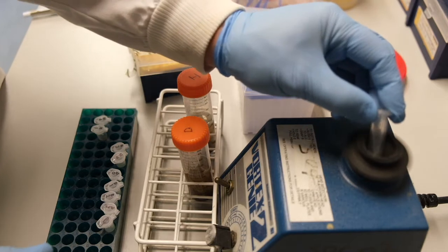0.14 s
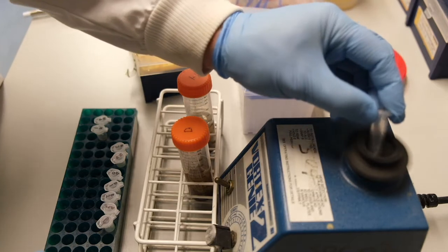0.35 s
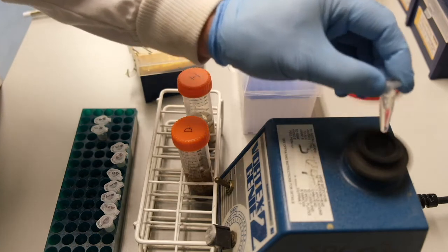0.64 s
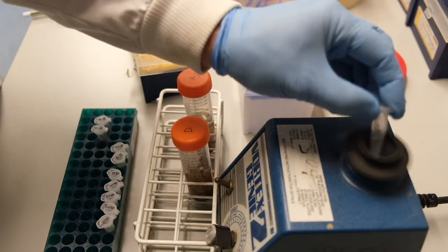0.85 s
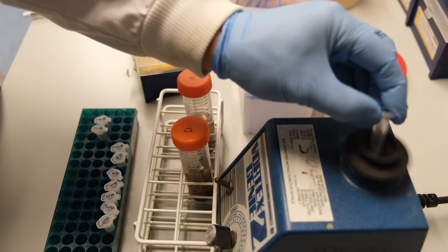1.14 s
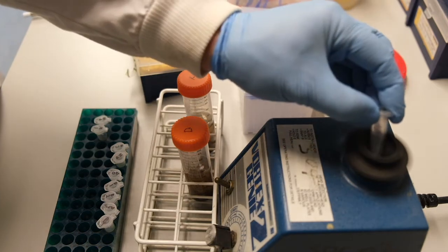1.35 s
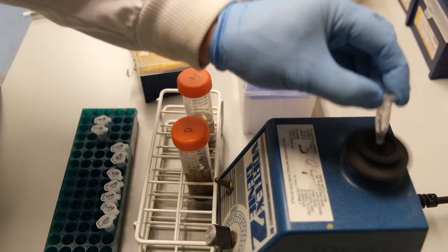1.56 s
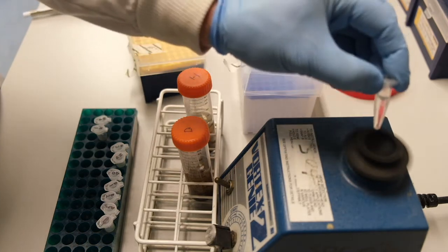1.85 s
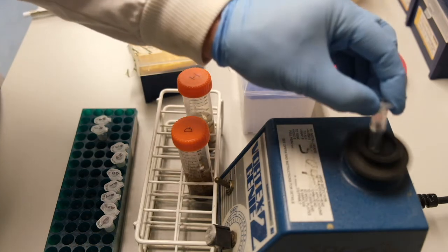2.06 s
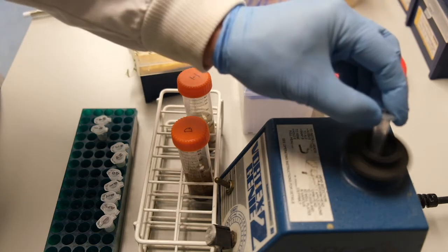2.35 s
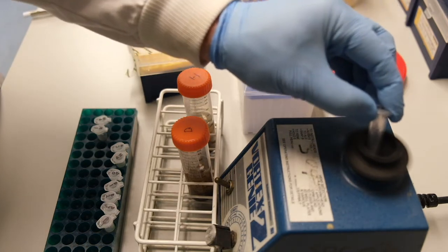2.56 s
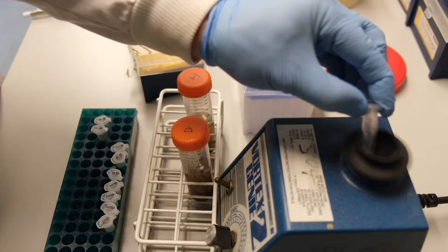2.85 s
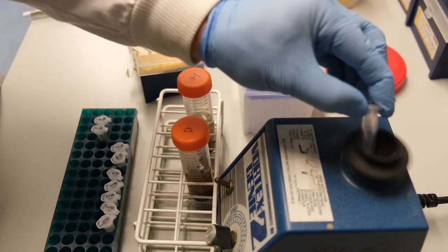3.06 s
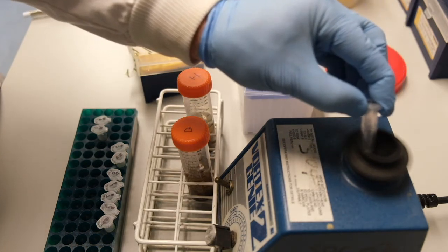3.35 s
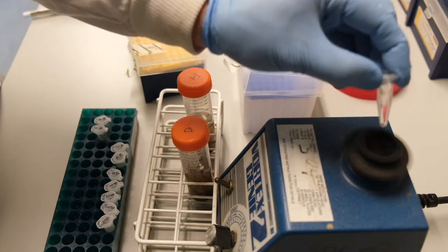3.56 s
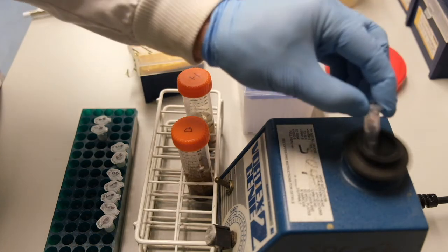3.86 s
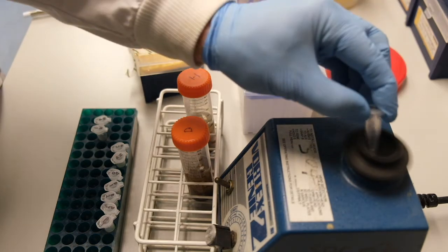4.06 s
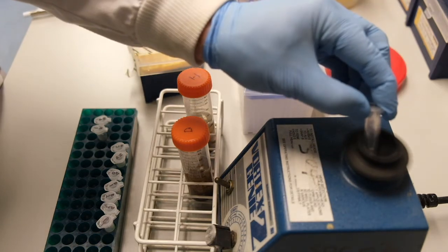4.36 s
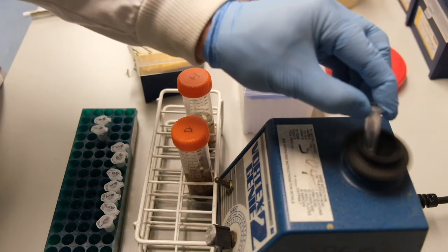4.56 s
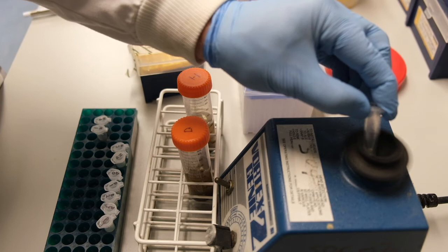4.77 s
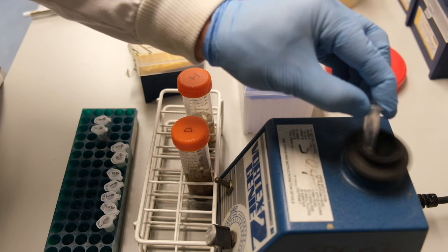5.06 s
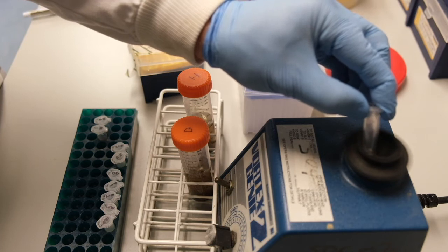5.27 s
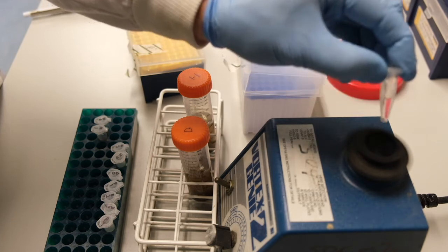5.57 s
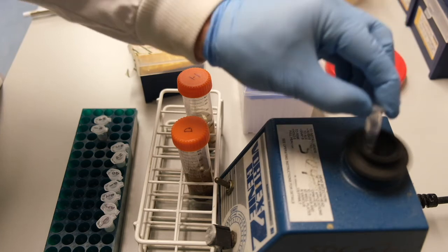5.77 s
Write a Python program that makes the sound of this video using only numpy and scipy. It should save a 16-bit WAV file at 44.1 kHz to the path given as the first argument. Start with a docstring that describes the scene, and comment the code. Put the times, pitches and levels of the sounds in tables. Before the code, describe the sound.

A plastic tube clicks and buzzes on and off as it is dipped into the cup of a humming lab mixer.

```python
"""Small vortex mixer on a lab bench: its eccentric weight thumps the housing once a turn.
A plastic microtube is dipped repeatedly into the orbiting rubber cup. It ticks going in and out;
while pressed it rattles against the cup twice a turn and stirs the rubber's resonances,
with a few faint squeaks. The bearing hisses faintly; another appliance drones in the room."""
import sys
import numpy as np
from scipy import signal
from scipy.fft import rfft, irfft, next_fast_len
from scipy.io import wavfile
from scipy.ndimage import uniform_filter1d

SR = 44100
rng = np.random.default_rng(int(sys.argv[2]) if len(sys.argv) > 2 else 0)


def materialize(psi):
    """Save the field psi as 16-bit PCM at rate SR to the path in sys.argv[1].

    A 1-D psi becomes a single channel; in a 2-D psi each row is a channel.
    """
    bounded = np.clip(np.atleast_2d(psi).T, -1, 1)
    quanta = np.round(bounded * 32767).astype(np.int16)
    wavfile.write(sys.argv[1], SR, quanta)


N = 261072
TIME_S = np.arange(N) / SR

# motor speed: time_s, turn_rate_hz
MOTOR_SPEED = [(0.0, 45.64), (0.3, 45.41), (0.5, 46.16), (0.8, 45.66), (1.15, 45.39), (1.55, 45.9),
               (1.95, 45.75), (2.2, 45.49), (2.55, 45.87), (2.9, 45.49), (3.4, 45.91), (3.75, 45.75),
               (4.05, 45.63), (4.5, 45.65), (4.9, 45.82), (5.2, 45.63), (5.45, 45.85), (5.92, 45.45)]
# hum envelope: time_s, level_db
HUM_LEVEL = [(0.0, -38.5), (0.08, -39.5), (0.33, -29.5), (0.48, -31.5), (0.54, -27.5), (0.74, -24),
             (1.25, -24.5), (1.32, -21.5), (1.5, -25.5), (1.52, -22), (1.88, -20.5), (2.01, -23),
             (3.76, -20.5), (3.87, -22), (4.29, -20.5), (4.32, -22), (5.74, -20), (5.92, -22.5)]
# housing and bench harmonics: multiple_of_turn_rate, relative_db
HUM_ORDERS = [(1, -16.5), (2, -4), (3, -5), (4, 1.5), (5, -3), (6, -2.5), (7, -12), (8, -13), (9, -22.5),
              (10, -7.5), (11, -7), (12, -24), (13, -20), (14, -24.5), (15, -23), (16, -31), (17, -29.5),
              (18, -30), (19, -34.5), (20, -32), (21, -29), (22, -57), (23, -32), (24, -35)]
# bearing hiss spectrum: freq_hz, gain_db
HISS_SPECTRUM = [(25, 0), (60, 17), (150, 20.5), (450, 15), (650, 12), (1000, 7), (1400, 3), (1800, -2),
                 (2400, -0.5), (3400, -6), (6400, -3), (8200, -16), (12000, -18.5), (16000, -20.5)]
# bearing resonances: pitch_hz, width_hz, relative_db
BEARING_RINGS = [(1055, 13, -28), (2494, 60, -13), (2982, 30, -15.5), (6230, 200, -21), (6950, 45, -22.5)]
# other appliance: pitch_hz, rms_db
DRONE_TONES = [(24.7, -51.5), (49.4, -63)]
# tube held in the cup, two wall contacts a turn: start_s, end_s, first_contact_db, second_contact_db,
# end_slack_db, looseness_ratio, midway_turns, start_gap_turns, end_gap_turns, treble_db, upper_ring_db
TUBE_PRESSES = [(0, .119, -68, -55.5, 0.5, 0.4, .32, 0.45, 0.47, -1, -73),
                (0.178, 0.383, -72, -46.5, 3.5, 0.53, 0.39, 0.51, 0.55, -6, -53),
                (0.899, 1.083, -38, -37, 1.5, 0.5, .38, 0.55, .56, 2.5, -41),
                (1.086, 1.199, -61, -48, 1.5, .25, 0.34, .52, 0.47, 7, -58),
                (1.201, 1.554, -43, -42, 2, 0.63, .71, .26, .22, 1, -43),
                (2.109, 2.187, -43.5, -41, 3, 0.5, 0.37, 0.4, 0.53, 0, -40.5),
                (2.191, 2.254, -45.5, -56, 1.5, .4, 0.4, 0.44, 0.5, 3.5, -58),
                (2.28, 2.429, -64.5, -45.5, 4.5, .25, .44, .5, 0.49, 4, -67),
                (2.77, 3.269, -43.5, -44, 5, 0.22, .475, .5, .6, -0.5, -49),
                (3.277, 3.407, -44.5, -46, 2, 0, .47, .66, .5, -1, -57),
                (3.869, 4.099, -40, -43.5, 4.5, .32, 0.45, 0.3, 0.71, -1.5, -45),
                (4.215, 4.524, -42, -44.5, 8, 0.3, .445, 0.75, 0.73, -2, -41.5),
                (4.919, 5.244, -53, -56.5, 4.5, .7, 0.6, 0.77, 0.77, -7, -48),
                (5.851, 5.97, -40.5, -45, 6.5, 0.26, 0.38, 0.56, 0.56, -3, -37.5)]
# modes of tube, cup and housing: pitch_hz, relative_db, t60_s
CONTACT_MODES = [(436, -9.5, 0.087), (950, -20, 0.036), (1440, -10.5, 0.0093), (2162, -7.5, 0.01),
                 (2440, -5, 0.0075), (2970, -17.5, 0.013), (3620, -10.5, 0.0065), (4690, -18.5, 0.025),
                 (5270, -26, 0.022), (5390, -13, 0.0094), (7510, -12, 0.007), (9900, -26, 0.011),
                 (10400, -20, 0.012)]
# dry plastic crack spectrum: freq_hz, gain_db
CRACK_SPECTRUM = [(300, -9.5), (900, -7), (1300, -4), (1700, -5.5), (2200, 6.5), (2600, 2.5), (3200, 2),
                  (4800, 3), (6500, -2), (8000, -3.5), (10000, -3.5), (12000, -10), (16000, -14.5)]
# tube strikes the cup going in or out: start_s, level_db, treble_db
RIM_TAPS = [(0.4721, -32.5, -1), (0.495, -36, 8.5), (0.7793, -24, 0), (0.7963, -21.5, 2),
            (0.8992, -21.5, -7), (1.936, -20.5, -10), (2.134, -19, -6), (2.2141, -23, -7),
            (2.259, -27, 5.5), (3.428, -25.5, -1.5), (3.454, -28.5, 3.5), (3.8025, -23, 0.5),
            (3.8199, -16, -2), (5.4177, -26, -6), (5.442, -26, 6.5), (5.7935, -21, 5), (5.8105, -24.5, -1)]
# rubber squeaks on the tube: start_s, end_s, level_db
RUBBER_SQUEAKS = [(4.485, 4.543, -48), (4.662, 4.787, -58), (4.923, 5.26, -59.5)]
# left-right likeness: freq_hz, correlation
STEREO_LIKENESS = [(100, 0.62), (500, 0.31), (1000, 0.7), (2000, 0.81), (4000, 0.33), (8000, 0.11),
                   (16000, 0.15)]
# stereo balance: freq_hz, left_minus_right_db
STEREO_BALANCE = [(180, -.3), (350, .7), (550, 1), (1200, -1.5), (2800, -1.3), (5500, 0), (10000, -2.4),
                  (14000, -4.6)]


def from_db(db):
    """Decibels to gain."""
    return 10 ** (np.asarray(db) / 20)


def unit_rms(x):
    """Scale to unit power."""
    return x / np.sqrt(np.mean(x ** 2) + 1e-20)


def at_hz(points, hz):
    """Interpolate a spectrum on a log-frequency axis."""
    freq_hz, value = np.transpose(points)
    return np.interp(np.log(np.maximum(hz, 1)), np.log(freq_hz), value)


def drift(rate_hz):
    """Slow random wander, unit rms."""
    hop, settle = 40, 2000
    pole = np.exp(-2 * np.pi * hop * rate_hz / SR)
    noise = rng.standard_normal(N // hop + settle + 2)
    slow = signal.lfilter([1], [1, -2 * pole, pole * pole], noise)[settle:]
    return np.interp(np.arange(N) / hop, np.arange(len(slow)), unit_rms(slow))


def ring(drive, hz, t60_s):
    """Damped mode: a unit click starts a unit sine."""
    radius, step_rad = 10 ** (-3 / (t60_s * SR)), 2 * np.pi * hz / SR
    poles = [1, -2 * radius * np.cos(step_rad), radius * radius]
    return signal.lfilter([0, np.sin(step_rad)], poles, drive + 1e-18)


def colour(x, spectrum, size=4096):
    """Minimum-phase filter with the given spectrum."""
    gain = from_db(at_hz(spectrum, np.fft.rfftfreq(size, 1 / SR)))
    cepstrum = irfft(np.log(gain))
    half = size // 2
    folded = np.r_[cepstrum[0], 2 * cepstrum[1:half], cepstrum[half], np.zeros(half - 1)]
    response = irfft(np.exp(rfft(folded)))
    return signal.fftconvolve(np.atleast_2d(x), response[None], axes=1)[:, :N]


def spread(pair):
    """Mid and side to left and right, least alike in the treble."""
    mid, side = rfft(pair, next_fast_len(N))
    alike = at_hz(STEREO_LIKENESS, np.linspace(0, SR / 2, len(mid)))
    return irfft(np.sqrt(1 + alike) * mid + np.sqrt(1 - alike) * side * [[1], [-1]])[:, :N]


def brighten(x, starts_s, treble_db, corner_hz=5000):
    """Each press or tap has its own brightness; each shelf gain holds until the next start."""
    latest = np.maximum(np.searchsorted(starts_s, TIME_S + .002, side="right") - 1, 0)
    dull = signal.sosfilt(signal.butter(1, corner_hz, fs=SR, output="sos"), x)
    return dull + from_db(treble_db[latest]) * (x - dull)


def housing_hum(turns, load, swell_db, housing_hz=180, node_hz=250, damping=0.18, scatter_hz=750):
    """One rounded thump a turn, drawn out by the housing resonance; tube load shakes its timing."""
    thump_turns, wobble_turns = .465, 0.011
    cup_hz, cup_width_hz = 450, 35
    angle_rad = 2 * np.pi * (turns - thump_turns + wobble_turns * load * drift(27))
    turn_rate_hz = np.mean(np.array(MOTOR_SPEED)[:, 1])
    out = np.zeros(N)
    for order, level_db in HUM_ORDERS:
        hz = order * turn_rate_hz
        # orders between resonance and antiresonance lag; high ones arrive by many paths
        pole, zero = (1 - (hz / f) ** 2 + 1j * damping * hz / f for f in (housing_hz, node_hz))
        phase_rad = np.angle(zero / pole) + (hz / scatter_hz) ** 2 * rng.standard_normal()
        near_cup = np.exp(-((hz - cup_hz) / cup_width_hz) ** 2)
        waver_db = 0.5 * (1 + hz / 400) * drift(6.24)
        out += from_db(level_db + waver_db + near_cup * swell_db) * np.cos(order * angle_rad + phase_rad)
    return unit_rms(out)


def bearing_hiss(turns, throb=0.19, throb_turns=0.48, noise_db=4.0):
    """Smooth hiss with a few thin rings, swelling once a turn."""
    hiss = colour(spread(rng.standard_normal((2, N))), HISS_SPECTRUM) * from_db(noise_db)
    white = spread(rng.standard_normal((2, N)))
    for hz, width_hz, level_db in BEARING_RINGS:
        t60_s = np.log(1000) / (np.pi * width_hz)
        hiss += from_db(level_db) * unit_rms(ring(white, hz, t60_s))
    return hiss * (1 + throb * np.cos(2 * np.pi * (turns - throb_turns)))


def appliance_drone():
    """Far motor and its second order, which beats against the mixer's turn rate."""
    return sum(np.sqrt(2) * from_db(rms_db) * np.sin(2 * np.pi * (hz * TIME_S + rng.random()))
               for hz, rms_db in DRONE_TONES)


def press_arch(at_s, start_s, end_s, end_slack_db):
    """A press firms up and lets go: progress 0-1, slack_db, gain (0 while lifted)."""
    progress = np.clip((at_s - start_s) / (end_s - start_s), 0, 1)
    slack_db = end_slack_db * (2 * progress - 1) ** 2
    return progress, slack_db, from_db(-slack_db) * (at_s >= start_s) * (at_s < end_s)


def grip():
    """Tube on cup over time: load 0-1, sliding 0-1, drive of the upper resonance."""
    load, sliding, stirring = np.zeros((3, N))
    for start_s, end_s, first_db, second_db, end_slack_db, looseness, *_, upper_db in TUBE_PRESSES:
        *_, gain = press_arch(TIME_S, start_s, end_s, end_slack_db)
        force = gain * np.hypot(from_db(first_db), from_db(second_db))
        load += force
        sliding += force * looseness
        stirring += gain * from_db(upper_db)
    return load / load.max(), sliding / sliding.max(), stirring


def cup_swell_db(sliding, depth_db=7, waver_db=1.1, smoothing_s=0.089):
    """The cup's main resonance swells with sliding; the rubber smooths the hand's motion."""
    eased = uniform_filter1d(sliding, int(smoothing_s * SR))
    return depth_db * (eased - eased.mean()) + waver_db * drift(7.3)


def rubber_ring(hz, width_hz):
    """Sliding rubber keeps a resonance sounding unsteadily: noise through the mode twice."""
    t60_s = np.log(1000) / (np.pi * width_hz)
    return unit_rms(ring(ring(rng.standard_normal(N), hz, t60_s), hz, t60_s))


def rubber_cup(turns, main_db, upper_gain, throb=0.34, throb_turns=0.69):
    """The cup's two resonances and its squeaks, stirred on every turn."""
    main = from_db(main_db) * rubber_ring(hz=437, width_hz=45)
    upper = upper_gain * rubber_ring(hz=918, width_hz=150)
    return (main + upper + squeaks()) * (1 + throb * np.cos(2 * np.pi * (turns - throb_turns)))


def clicks_at(times_s, sizes):
    """Train of one-sample clicks."""
    out = np.zeros(N)
    samples = np.clip(np.round(times_s * SR).astype(int), 0, N - 1)
    np.add.at(out, samples, sizes * (times_s < N / SR))
    return out


def tube_contacts(clicks, crack_s, crack_db, snap_db, ring_db, variety):
    """Each contact: a clean snap, a gritty crack and a blow of random strength to every mode."""
    pressure = signal.lfilter([1], [1, -np.exp(-1 / (crack_s * SR))], clicks + 1e-18)
    crack = spread(pressure * rng.standard_normal((2, N)))
    rings, hits = np.zeros((2, N)), np.flatnonzero(clicks)
    mid_only = np.array([[1], [0]])
    for hz, level_db, t60_s in CONTACT_MODES:
        blows = np.zeros((2, N))
        blows[:, hits] = clicks[hits] * (mid_only + variety * rng.standard_normal((len(hits), 2)).T)
        rings += from_db(level_db) * ring(blows, hz, t60_s)
    attack = colour(from_db(crack_db) * crack + from_db(snap_db) * clicks, CRACK_SPECTRUM)
    return attack + from_db(ring_db) * spread(rings)


def tube_rattle(turns, bounce_s=0.001, jitter_s=.00005, uneven_db=.8, gap_turns_per_db=-0.04):
    """Two wall contacts a turn, their gap shifting with the grip; a loose tube bounces twice on each."""
    turn = np.arange(int(turns[-1]) + 1)
    clicks = np.zeros(N)
    for press in TUBE_PRESSES:
        start_s, end_s, first_db, second_db, end_slack_db, looseness = press[:6]
        midway_turns, start_gap_turns, end_gap_turns = press[6:9]
        midway_s = np.interp(turn + midway_turns, turns, TIME_S)
        progress, slack_db, _ = press_arch(midway_s, start_s, end_s, end_slack_db)
        gap_turns = start_gap_turns + (end_gap_turns - start_gap_turns) * progress
        gap_turns += gap_turns_per_db * slack_db
        bounce_norm = np.sqrt(1 + looseness ** 2 + looseness ** 4)  # bounces share the energy
        for offset_turns, level_db in ((-gap_turns / 2, first_db), (gap_turns / 2, second_db)):
            when_s = np.interp(turn + midway_turns + offset_turns, turns, TIME_S, right=N / SR)
            when_s += jitter_s * rng.standard_normal(len(turn))
            *_, gain = press_arch(when_s, start_s, end_s, end_slack_db)
            force = gain * from_db(level_db) / bounce_norm
            for bounce in range(3):
                uneven = from_db(uneven_db * rng.standard_normal(len(turn)))
                clicks += clicks_at(when_s, force * looseness ** bounce * uneven)
                when_s += bounce_s * rng.uniform(.5, 1.5, len(turn))
    rattle = tube_contacts(clicks, crack_s=0.0012, crack_db=11, snap_db=26.5, ring_db=13.5, variety=0.32)
    starts_s, *_, treble_db, _ = np.transpose(TUBE_PRESSES)
    return brighten(rattle, starts_s, treble_db)


def rim_taps():
    """Single harder knocks of the tube on the cup's rim."""
    starts_s, level_db, treble_db = np.transpose(RIM_TAPS)
    clicks = clicks_at(starts_s, from_db(level_db))
    knocks = tube_contacts(clicks, crack_s=0.0024, crack_db=-5, snap_db=7.5, ring_db=-5, variety=.3)
    return brighten(knocks, starts_s, treble_db)


def squeaks(hz=3050, width_hz=220, end_slack_db=7):
    """Rubber on tube: thin squeaks that swell and fade."""
    envelope = sum(from_db(level_db) * press_arch(TIME_S, start_s, end_s, end_slack_db)[2]
                   for start_s, end_s, level_db in RUBBER_SQUEAKS)
    return envelope * rubber_ring(hz, width_hz)


def lab_echoes(x, early_t60_s=0.014, early_db=-10, late_t60_s=0.24, late_db=-8.5, gap_s=0.0026):
    """Quick scatter off bench and racks, then a short room tail, different at each ear."""
    t_s = TIME_S[:SR // 2]
    out = np.zeros((2, N))
    for t60_s, level_db in ((early_t60_s, early_db), (late_t60_s, late_db)):
        echoes = rng.standard_normal((2, len(t_s))) * 10 ** (-3 * t_s / t60_s) * (t_s > gap_s)
        echoes /= np.sqrt(np.sum(echoes ** 2, axis=1, keepdims=True))
        out += from_db(level_db) * signal.fftconvolve(x.mean(axis=0)[None], echoes, axes=1)[:, :N]
    return spread(out)


def scene(start_turns=.079, cup_re_hum_db=-17.5, empty_re_hum_db=-37, hiss_db=-37.5, hiss_follow=0.56):
    """Motor rotation times the hum, cup, hiss and rattle; only the plastic contacts echo."""
    turns = start_turns + np.cumsum(np.interp(TIME_S, *np.transpose(MOTOR_SPEED))) / SR
    hum_db = np.interp(TIME_S, *np.transpose(HUM_LEVEL))
    load, sliding, stirring = grip()
    swell_db = cup_swell_db(sliding)
    hum = from_db(hum_db) * housing_hum(turns, load, swell_db)
    upper_gain = np.hypot(stirring, from_db(hum_db + empty_re_hum_db))  # the empty cup rings too
    rubber = rubber_cup(turns, hum_db + cup_re_hum_db + swell_db, upper_gain)
    hiss = from_db(hiss_db + hiss_follow * hum_db) * bearing_hiss(turns)
    plastic = tube_rattle(turns) + rim_taps()
    return hum + rubber + hiss + appliance_drone() + plastic + lab_echoes(plastic)


def record(dry, delay_samples=2, ceiling=.37, cutoff_hz=16100):
    """Mixer to the right: left channel later and duller. Peaks rounded, top cut."""
    delayed = np.r_[np.zeros(delay_samples), dry[0, :-delay_samples]]
    left = colour(delayed, [(hz, db / 2) for hz, db in STEREO_BALANCE])
    right = colour(dry[1], [(hz, -db / 2) for hz, db in STEREO_BALANCE])
    stereo = np.vstack([left, right])
    rounded = stereo / (1 + (stereo / ceiling) ** 8) ** (1 / 8)
    return signal.sosfilt(signal.ellip(10, .1, 80, cutoff_hz, fs=SR, output="sos"), rounded)


dry = scene()
out = record(dry)
materialize(out)
```